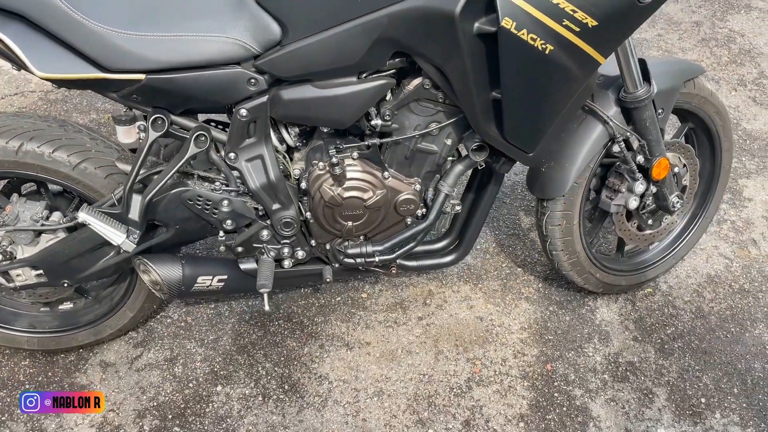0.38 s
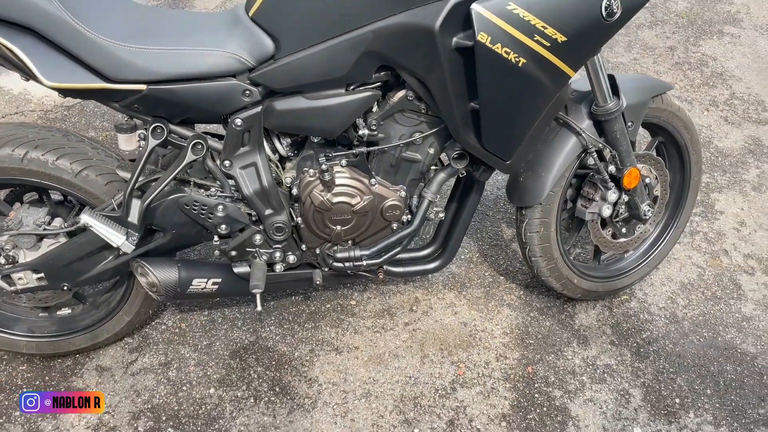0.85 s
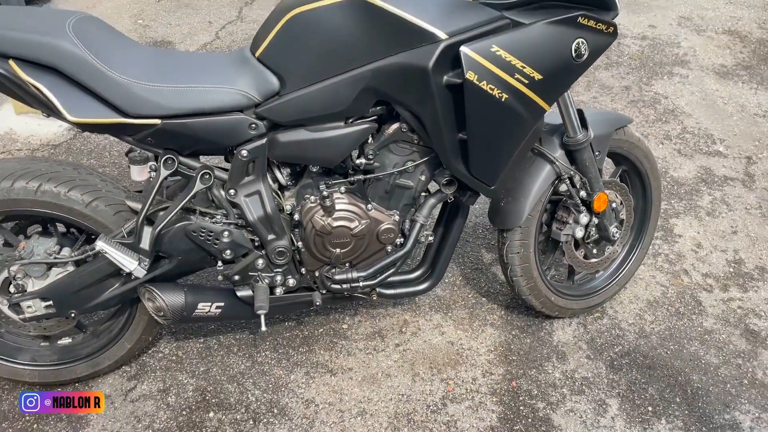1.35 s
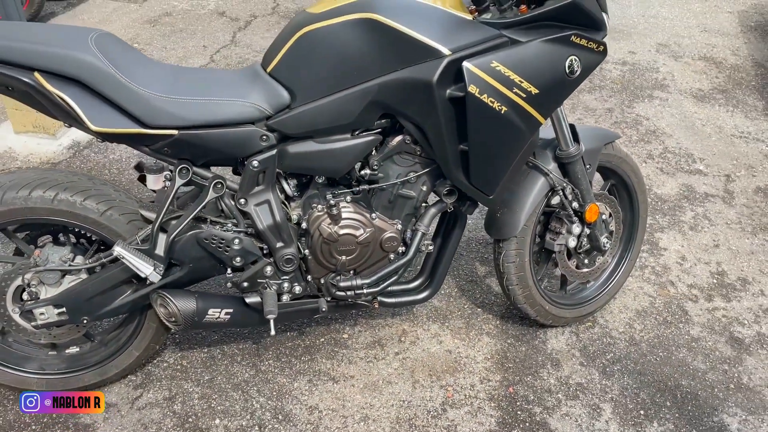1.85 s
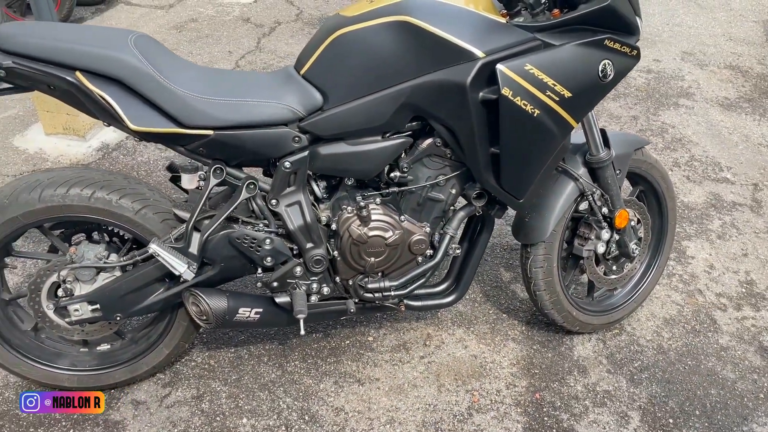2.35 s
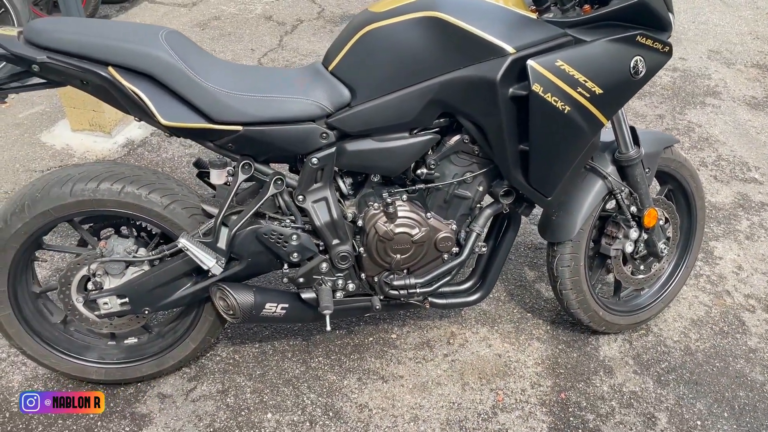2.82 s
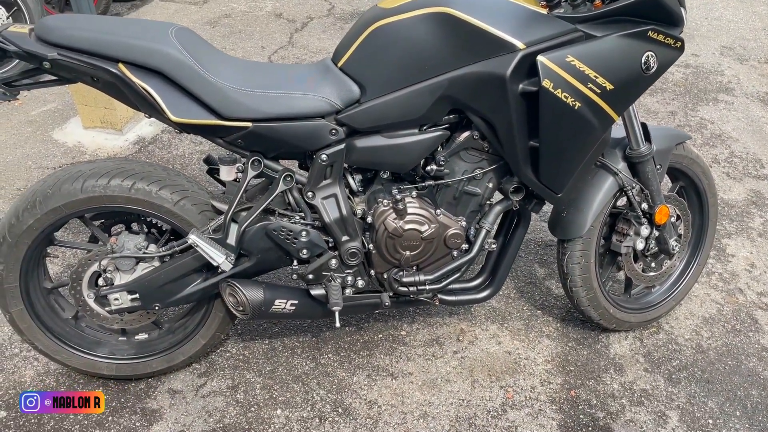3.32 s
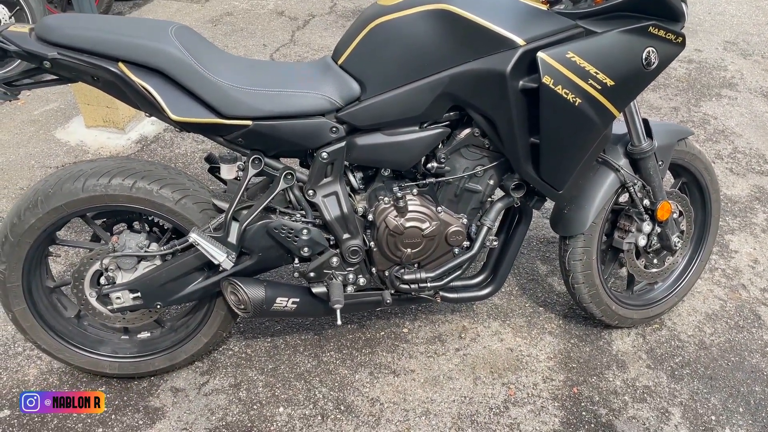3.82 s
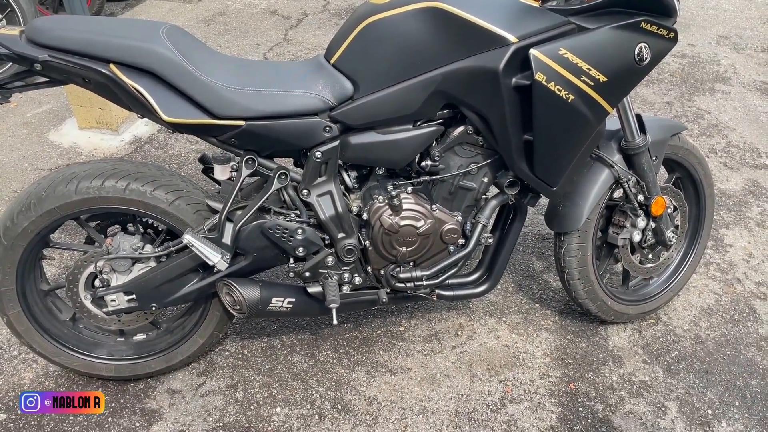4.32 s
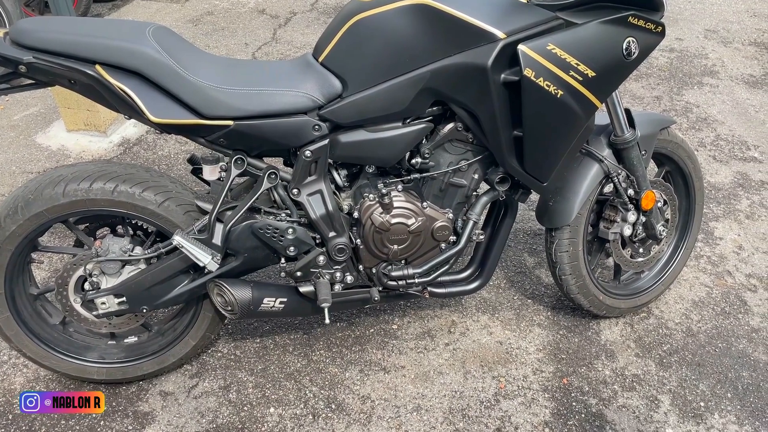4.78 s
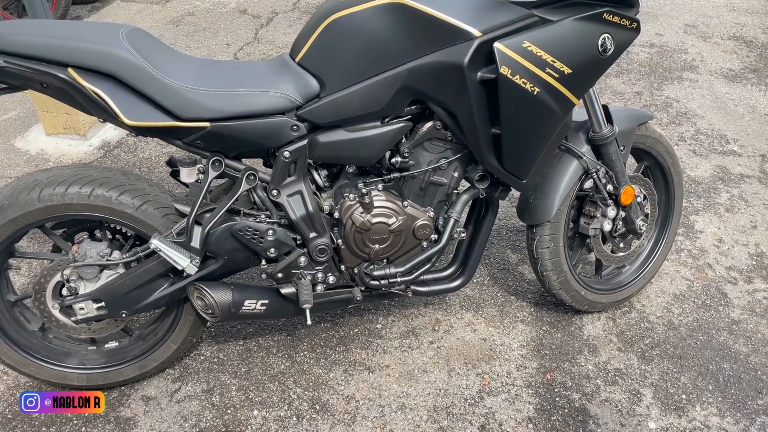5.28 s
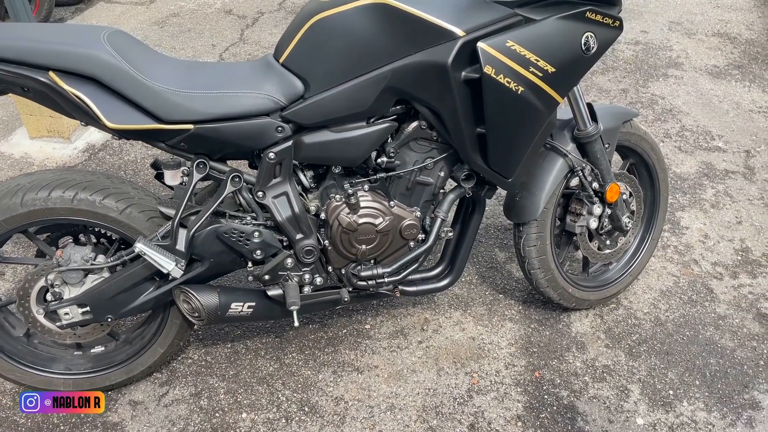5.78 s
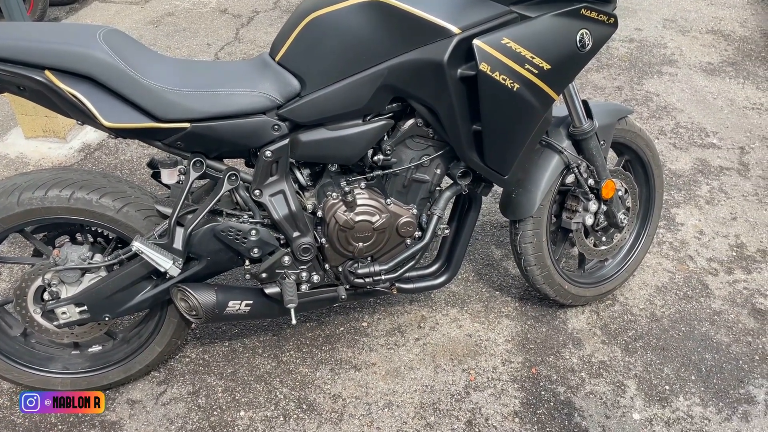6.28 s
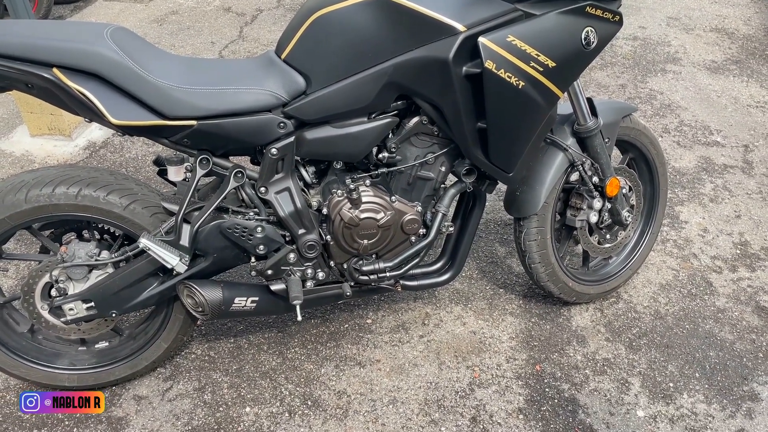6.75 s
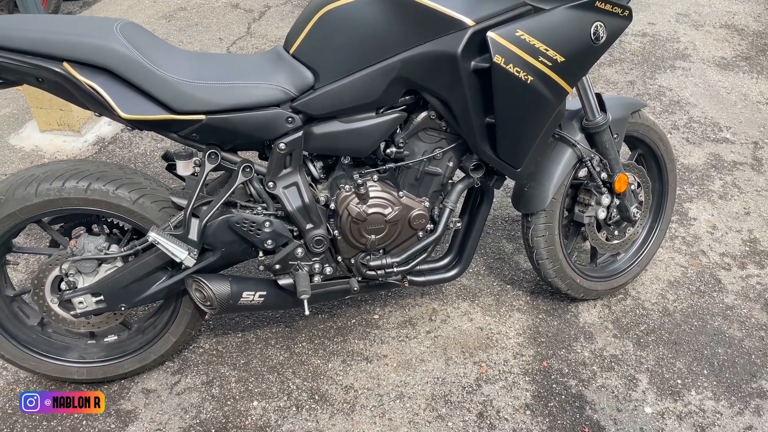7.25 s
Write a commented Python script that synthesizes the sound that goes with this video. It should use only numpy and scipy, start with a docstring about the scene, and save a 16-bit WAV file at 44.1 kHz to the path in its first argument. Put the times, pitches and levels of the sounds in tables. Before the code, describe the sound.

A twin-cylinder motorcycle idles continuously on open paving, already running at the start and never revved. Its exhaust beats in uneven pairs, about thirteen pairs a second, deep and throaty. Engine cases rattle, valves tick and hiss in step, and a metallic tappet ping stands out around two seconds. Close stereo microphone, shifting slightly in position so the tone moves between boomy and sharper; little space, only short reflections off ground and bodywork.

```python
"""A twin-cylinder motorcycle with a 270-degree crank idles outdoors on paving, close to a stereo microphone.
From the start uneven pairs of firings ring damped pipe modes, gated noise makes the case rattle and hiss,
small parts and a tappet ping in step with the crank, and a low noise rumbles underneath.
Faint sliding sine tones enter at about 0.7, 1.4 and 2.4 s; the tappet is brightest near 2.2 s.
The listener drifts through three standpoints, moving most near 1.2 and 5 s, which rebalances the modes."""
import sys
import numpy as np
from scipy import signal
from scipy.fft import rfft, irfft, next_fast_len
from scipy.io import wavfile
from scipy.ndimage import uniform_filter1d, map_coordinates

SR = 44100
rng = np.random.default_rng(int(sys.argv[2]) if len(sys.argv) > 2 else 0)


def dump(signal):
    """Clip the signal to [-1, 1] and save it as 16-bit WAV at the path in sys.argv[1]."""
    limited = np.clip(np.atleast_2d(signal).T, -1, 1)
    pcm = np.round(limited * 32767).astype(np.int16)
    wavfile.write(sys.argv[1], SR, pcm)


def undo_db(level):
    """Turn decibels back into plain size, where 20 dB means ten times bigger."""
    steps = np.asarray(level, float) / 20
    return 10 ** steps


N = 325450
WARM = SR // 4  # samples of running before time zero, so that the first firings have a past
START_CYCLE = -.1372  # cycle count at time zero
FIRING_LEAD = .3757  # share of a cycle by which the first cylinder fires ahead of the second
HUM_LINGER = .5  # share by which a slide slows in its middle
HUM_WAVER_DB = 1.2  # unsteadiness of the thin tones' level

# Four-stroke cycle rate, hunting around the idle. Each row: time in seconds, rate in cycles per second.
CYCLE_RATE = [(0.0, 12.86), (0.65, 13.57), (1.16, 13.558), (1.37, 13.928), (1.85, 13.838), (2.1, 14.359),
              (2.31, 13.887), (2.93, 13.48), (3.12, 13.91), (3.79, 13.905), (4.13, 13.462), (4.69, 13.655),
              (5.2, 13.036), (5.31, 13.275), (5.83, 12.931), (6.0, 12.534), (6.65, 13.288), (7.38, 12.692)]
# Slow-swelling boom of the silencer.
# Each row: mode in Hz, t60 in seconds, signed weight, level in dB at standpoints 1, 2 and 3.
BOOM_MODES = [(47.7, 0.03, 0.9, -27.4, -48.0, 9.5), (72.5, 0.17, 1, -27, -34, -55.0),
              (83.3, 0.075, -0.71, 5, 4.5, 6), (114.9, 0.071, -0.52, 14, 4.5, 8),
              (126.25, 0.18, 0.97, -11, -6, -14), (132.3, 0.079, 1, 5, -2.5, 3.1),
              (166.4, 0.12, -0.72, -4.5, -2.5, 3.5), (205.2, 0.049, -0.61, 3.0, 10, 12.5),
              (50.8, 0.22, -0.88, -21, -16, -45), (40.9, 0.16, -1.05, -42, -28, -20)]
# Sharp bark of the header pipes.
# Each row: mode in Hz, t60 in seconds, signed weight, level in dB at standpoints 1, 2 and 3.
BARK_MODES = [(202.3, 0.092, -0.73, -7.5, -2.5, -5), (258.5, 0.14, 1, -20, -23.5, -15),
              (258, 0.0083, 0.91, 4.5, 7.0, 0), (325, 0.027, -0.83, -11, -7, -8),
              (398, 0.051, 0.97, -45, -22, -28), (409, 0.054, -0.99, -12, -17, -18),
              (453.3, 0.019, -1.3, -14, -11.5, -13), (213.3, 0.17, -0.54, -17.5, -20.5, -18.5),
              (291, 0.11, 0.69, -22.5, -30.5, -23), (326, 0.12, 0.94, -60, -21, -23),
              (494, 0.067, -1.93, -28, -31.5, -33), (561, 0.036, -0.74, -37, -23.5, -29)]
# The listener's drift. Each row: time in seconds, standpoint counted 0 to 2, fractions lying between.
STANDPOINT = [(0, 0.31), (.9, 0.07), (1.5, 0.77), (4.7, 0.89), (5.2, 1.6), (7.38, 1.76)]
# Rise and fall of the engine layers.
# Each row: time in seconds, exhaust gain in dB, relative case rattle in dB, valve hiss gain in dB.
EFFORT_LEVELS = [(0, 3.5, -29, -38), (.5, 1.5, -27.5, -36.5), (1, 1, -29, -38.5), (2.3, 2, -28.5, -37.5),
                 (5.5, 2, -28.5, -39), (7.38, 1, -29, -39.5)]
# Broad valve-gear contacts. Each row: place in the cycle 0 to 1, relative case knock in dB, relative hiss in dB.
VALVE_CONTACTS = [(.05, -4.5, 5.5), (.17, -1, -13), (.27, -18, 0), (.35, 2, 5.5), (.55, 7.5, -16),
                  (.69, -5, 4), (.81, 8, 8), (.9, -6, -4), (.97, 3, 5)]
# Colour of the engine cases. Each row: frequency in Hz, relative level in dB per Hz.
CASE_COLOUR = [(260, -26), (450, -2.5), (486, -4), (545, -23.5), (611, -5), (655, -25), (718, -5),
               (882, -11), (1140, -9), (1250, -11), (1600, -8.5), (2210, -10), (2800, -23.5), (3640, -52),
               (6160, -120)]
# Colour of the valve-gear hiss. Each row: frequency in Hz, relative level in dB per Hz.
GEAR_COLOUR = [(1530, -35), (2600, -4.5), (2900, -2), (3280, -1.5), (3690, -4.5), (5400, -1.5), (6390, -5),
               (6810, -3), (7700, -10.5), (10000, -136), (16900, -120)]
# Colour of the airy top. Each row: frequency in Hz, relative level in dB per Hz.
AIR_COLOUR = [(8300, -69), (8500, 2), (10500, 0.5), (11000, -5), (12000, -4.5), (14400, -2.5), (14600, -25),
              (15300, -25), (15500, 8), (15750, 0), (15900, -60)]
# Colour of the exhaust turbulence. Each row: frequency in Hz, relative level in dB per Hz.
GAS_COLOUR = [(25, -65), (50, -10), (130, -8.5), (250, -7.5), (450, -18.5), (700, -22), (1000, -70)]
# Stereo width of the noises. Each row: frequency in Hz, left-right likeness where 1 is identical.
LIKENESS = [(40, 0.75), (130, 1), (290, 0.79), (640, 0.46), (1410, 0.51), (3100, 0.61), (6800, 0.76),
            (15000, 0.6)]
# Stereo tilt of the whole scene. Each row: frequency in Hz, left minus right in dB.
LEFT_TILT = [(60, 1.5), (130, 0.4), (250, 2.5), (550, 2.5), (1100, 5), (2200, 2.5), (4500, -0.5),
             (15000, 0)]
# Faint thin tones that slide.
# Each row: start in seconds, length in seconds, first Hz, last Hz, rms in dB at the top of the swell before waver.
SLIDING_TONES = [(.66, .7, 640, 572, -37), (1.39, .11, 558, 570, -39), (2.41, .36, 580, 528, -37)]
# Pitched taps of single parts.
# Each row: place in the cycle 0 to 1, pitch in Hz, t60 in seconds, relative level in dB at standpoints 1, 2 and 3.
PART_TAPS = [(.84, 2050, .035, -38, -40, -25), (.87, 1140, .04, -28, -32, -36),
             (.02, 1050, .03, -35, -32, -34), (.11, 570, .02, -29, -33, -32),
             (.5, 2000, .025, -42, -42, -29), (.52, 1550, .03, -36, -31, -30),
             (.26, 1900, .02, -33, -33, -33), (.04, 1550, .02, -33, -31, -38),
             (.88, 3300, .02, -42, -40, -44), (.26, 3260, .05, -35, -46, -46),
             (.965, 4900, .012, -36, -35, -37), (.8, 3800, .015, -41, -45, -39),
             (.8, 5300, .015, -45, -43, -41), (.81, 7000, .01, -46, -46, -42),
             (.685, 7400, .01, -46, -43, -47), (.34, 5900, .012, -44, -41, -42),
             (.92, 1640, .05, -33, -42, -40)]
# Resonances of the covers under the rattle.
# Each row: centre in Hz, width in Hz, level in dB at standpoints 1, 2 and 3.
COVER_MODES = [(700, 74, -51, -44.5, -48.5), (1410, 47, -39, -45.5, -57), (1647, 55, -35.5, -58, -74),
               (3240, 38, -46, -57, -54), (1596, 180, -50, -46.5, -46.5), (1894, 106, -59, -53.5, -39.5)]
# Colour of the low outdoor rumble. Each row: frequency in Hz, relative level in dB per Hz.
RUMBLE_COLOUR = [(28, -40), (40, -11), (52, 12), (70, -1), (100, -61)]
# Stereo phase of the whole scene. Each row: frequency in Hz, radians by which the left leads the right.
LEFT_PHASE = [(60, -0.15), (430, 0.73), (1900, -0.38), (3000, -0.03), (4100, 0.7), (5400, 0.34), (8000, 2),
              (11000, 0.54)]
# Fader for the brightest tappet. Each row: time in seconds, gain in dB.
TAPPET_LEVEL = [(0, -38), (1.8, -29), (2.2, -22), (2.9, -26), (4.3, -28), (5, -35), (7.38, -38)]
# Echoes off nearby ground and bodywork.
# Each row: left delay in seconds, right delay in seconds, level in dB for the high notes.
NEAR_ECHOES = [(.0031, 0.0033, -30), (.0072, 0.0063, -18), (0.0127, 0.015, -13.5), (.021, 0.02, -17)]


def unit(x):
    """Scale to rms 1."""
    return x / np.sqrt(np.mean(x ** 2) + 1e-20)


def along(points, hz):
    """Read a curve of (Hz, value) points on a log frequency axis."""
    f, v = np.transpose(points)
    return np.interp(np.log(hz + 1), np.log(f + 1), v)


def curves(rows):
    """Automation: one value per sample for each column after the time."""
    s, *cols = np.transpose(rows)
    return [np.interp(np.arange(N) / SR, s, c) for c in cols]


def filtered(x, response):
    """Shape the spectrum of x by a response of frequency."""
    m = next_fast_len(N + 8192)
    return irfft(rfft(x, m) * response(np.fft.rfftfreq(m, 1 / SR)), m)[..., :N]


def noise(spectrum, gate):
    """Gated stereo noise, coloured, partly alike in both channels; rms 1."""
    def shape(hz):
        # the cosine of twice this angle is the left-right likeness
        angle = np.arccos(np.clip(along(LIKENESS, hz), -1, 1)) / 2
        return undo_db(along(spectrum, hz)) * [np.cos(angle), np.sin(angle)]
    mid, side = filtered(gate * rng.standard_normal((2, N)), shape)
    return unit(np.array([mid + side, mid - side]))


def beats(place, scatter_db, jitter_s):
    """One impulse per cycle at a given place, uneven in size and time; starts WARM samples early."""
    step = 49  # samples between readings of the crank
    when = np.arange(-WARM, N, step)
    rate = np.interp((when + step / 2) / SR, *np.transpose(CYCLE_RATE)) * step / SR
    cycle = START_CYCLE + np.cumsum(rate) - rate - WARM * CYCLE_RATE[0][1] / SR
    chance = rng.standard_normal((108, 2))  # timing and size of each cycle's impulse
    at = np.interp(np.arange(-5, 103) + place, cycle, when + WARM, left=-N, right=2 * N)
    at = np.round(at + jitter_s * SR * chance[:, 0]).astype(int)
    inside = (at >= 0) & (at < WARM + N)
    return np.bincount(at[inside], undo_db(scatter_db * chance[inside, 1]), WARM + N)


def played(impulses, shape):
    """Every impulse sets off the same shape."""
    return signal.fftconvolve(impulses, shape)[WARM:WARM + N]


def ring(hits, modes, delay_s, swell_s):
    """Impulses excite damped modes, cross-faded between the standpoints."""
    t = np.arange(SR // 4)[:, None] / SR
    hz, t60, weight, *views_db = np.transpose(modes)
    decay = undo_db(-60 * t / t60)
    shapes = weight * np.sin(2 * np.pi * hz * t) * decay * (1 - np.exp(-t / swell_s))
    late = np.pad(hits, (round(delay_s * SR), 0))
    where = curves(STANDPOINT)[0]
    sound = np.zeros(N)
    for view, db in enumerate(views_db):
        nearness = np.clip(1 - abs(where - view), 0, 1)
        sound += nearness * played(late, shapes @ undo_db(db))
    return sound


def puffs(impulses, rise_s, fall_s):
    """An envelope that swells and dies after every impulse."""
    t = np.arange(SR // 10) / SR
    return played(impulses, np.exp(-t / fall_s) * (1 - np.exp(-t / rise_s)))


def exhaust():
    """Two unevenly spaced firings a cycle, each with a weaker pulse as its valve shuts, plus turbulent gas."""
    first = beats(-FIRING_LEAD, .6, .00006)
    second = beats(0, .6, .00006)
    shut = .83 * beats(.274 - FIRING_LEAD, 1.2, .0002) + beats(.274, 1.2, .0002)
    boom = ring(0.8 * first + second + 0.057 * shut, BOOM_MODES, delay_s=0.00402, swell_s=0.018)
    # the first cylinder's longer header softens its bark, here by a lower level
    bark = ring(0.65 * first + second + 0.22 * shut, BARK_MODES, delay_s=.002, swell_s=0.0021)
    gas = undo_db(-33) * noise(GAS_COLOUR, .3 + puffs(first + second, .004, .015))
    return undo_db(curves(EFFORT_LEVELS)[0]) * (boom + bark + gas)


def taps():
    """Single parts are struck twice in quick succession each cycle and ring at their own pitch."""
    sound = np.zeros(N)
    for place, hz, t60, *db in PART_TAPS:
        strikes = beats(place, 2, .0007) + .6 * beats(place + .03, 3, .001)
        sound += ring(strikes, [(hz, t60, 1, *db)], delay_s=0, swell_s=0.00031)
    return sound


def tappet():
    """A damped metallic ping for each cylinder, the second one stronger."""
    t = np.arange(SR // 20) / SR
    ping = np.sin(2 * np.pi * 2290 * t) * undo_db(-60 * t / .045) * (1 - np.exp(-t / .002))
    strikes = beats(.875, 2, .0008) + .5 * beats(.885 - FIRING_LEAD, 3, .0008)
    return undo_db(curves(TAPPET_LEVEL)[0]) * played(strikes, ping)


def by_standpoint(levels_db):
    """A gain curve that blends three levels as the listener moves."""
    return undo_db(np.interp(curves(STANDPOINT)[0], [0, 1, 2], levels_db))


def peak(hz, width_hz):
    """Spectrum of one resonance, in (Hz, dB) points."""
    half = width_hz / 2
    return [(hz - 3 * width_hz, -40), (hz - half, -3), (hz + half, -3), (hz + 3 * width_hz, -40)]


def flicker(x, depth_db, below):
    """Narrow strips of the spectrum drop out for a few tens of milliseconds at random; rms 1."""
    z = signal.stft(x, nperseg=1024)[2]
    bins, frames = z.shape[1:]
    strips = np.repeat(rng.standard_normal((bins // 16 + 1, frames)), 16, axis=0)[:bins]
    strips = unit(uniform_filter1d(strips, size=4, axis=1))
    # a strip sinks towards the full depth as its random value falls under the threshold
    gain = undo_db(-depth_db / (1 + np.exp(8 * (strips - below))))
    return unit(signal.istft(z * gain, nperseg=1024)[1][:, :N])


def rattle():
    """Valve contacts knock the cases and hiss over a steady chain and gear rush."""
    _, case_db, hiss_gain_db = curves(EFFORT_LEVELS)
    places, knock_db, hiss_db = np.transpose(VALVE_CONTACTS)

    def gate(db, rise_s, fall_s):
        contacts = [beats(place, 2.8, 0.0018) for place in places]
        return puffs(undo_db(db) @ contacts, rise_s, fall_s)

    # the constant under each gate is the steady rush
    knocks = 4.0 + gate(knock_db, 0.00067, 0.0076)
    cases = undo_db(case_db - 2.0) * noise(CASE_COLOUR, knocks)
    covers = sum(by_standpoint(db) * noise(peak(hz, width), knocks) for hz, width, *db in COVER_MODES)
    gear = noise(GEAR_COLOUR, 2.26 + gate(hiss_db, 0.00055, 0.0057))
    air = noise(AIR_COLOUR, 1.4 + gate(hiss_db, 0.00095, 0.0053))
    air = undo_db(-6) * flicker(air, depth_db=41, below=-0.52)
    return cases + covers + undo_db(hiss_gain_db) * (gear + air)


def rumble():
    """A steady bed of low-coloured noise stands for the outdoors."""
    return undo_db(-35) * noise(RUMBLE_COLOUR, 1)


def hum():
    """Each thin sine tone swells, slides fastest at both ends, wavers and fades."""
    sound = np.zeros(N)
    # random levels 3000 samples apart, smoothly joined
    waver = map_coordinates(rng.standard_normal(N // 3000 + 4), [np.arange(N) / 3000])
    for start, length, first_hz, last_hz, db in SLIDING_TONES:
        u = np.arange(round(length * SR)) / (length * SR)
        slide = u + HUM_LINGER * np.sin(2 * np.pi * u) / (2 * np.pi)
        hz = first_hz + (last_hz - first_hz) * slide
        swell = np.sqrt(np.sin(np.pi * u))
        tone = np.sqrt(2) * np.sin(2 * np.pi * np.cumsum(hz) / SR)
        sound[round(start * SR):][:len(u)] += undo_db(db) * swell * tone
    return sound * undo_db(HUM_WAVER_DB * waver)


def echoed(x):
    """Short echoes, different on each side; low notes wrap round the reflectors and echo less."""
    def response(hz):
        echoes = 0
        for left_s, right_s, db in NEAR_ECHOES:
            delays = np.array([[left_s], [right_s]])
            echoes = echoes + undo_db(db) * np.exp(-2j * np.pi * hz * delays)
        return 1 + echoes / np.sqrt(1 + (220 / (hz + 1)) ** 4)
    return filtered(x, response)


def scene():
    """Mix engine, rumble and thin tones, then set left-right level and phase by frequency."""
    sound = echoed(exhaust() + taps() + tappet()) + rattle() + rumble() + hum()
    side = np.array([[.5], [-.5]])  # half of each difference goes to either side

    def placement(hz):
        return undo_db(along(LEFT_TILT, hz) * side) * np.exp(1j * along(LEFT_PHASE, hz) * side)
    return filtered(sound, placement)


def top_cut(x):
    """Nothing passes above the cut-off."""
    return signal.sosfilt(signal.butter(12, 15940, fs=SR, output="sos"), x)


def record(dry):
    """The microphone drops the lowest bass, steeply below about 35 Hz."""
    heard = filtered(dry, lambda hz: 1 / np.sqrt(1 + (35 / (hz + 1)) ** 16))
    return top_cut(heard)


dry = scene()
out = record(dry)
dump(out)
```